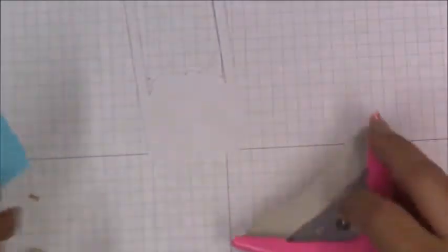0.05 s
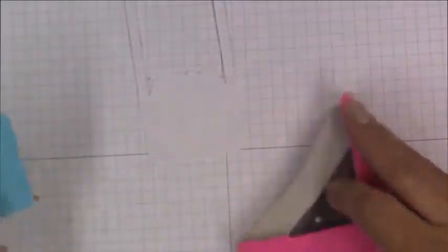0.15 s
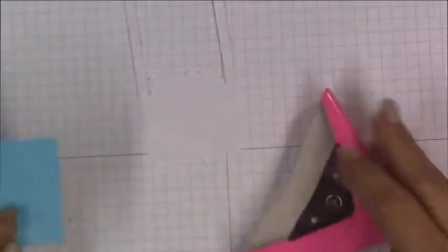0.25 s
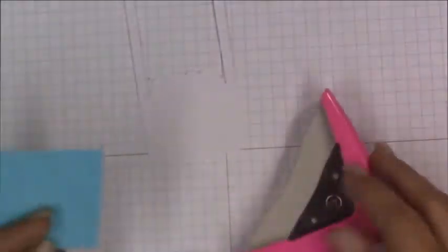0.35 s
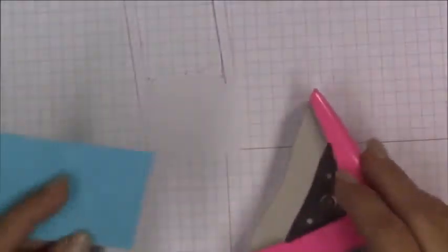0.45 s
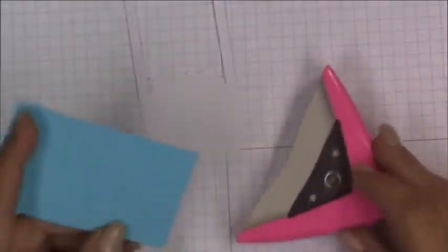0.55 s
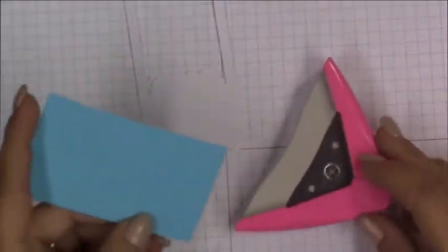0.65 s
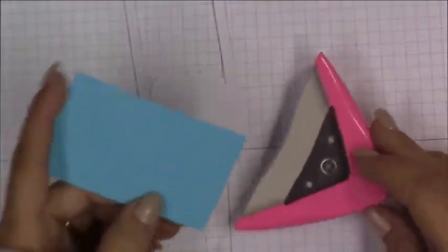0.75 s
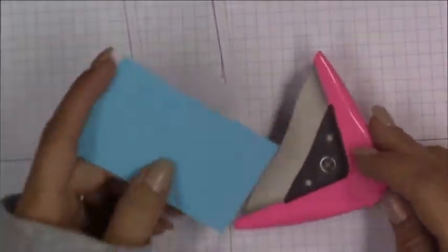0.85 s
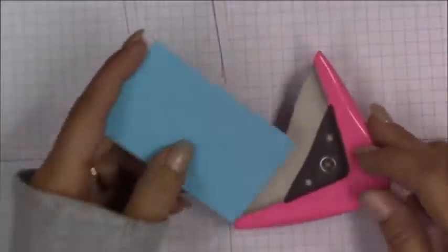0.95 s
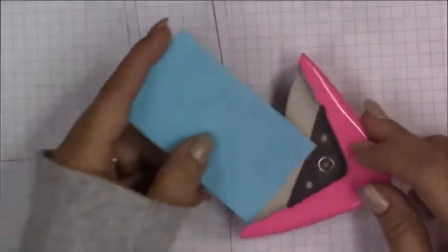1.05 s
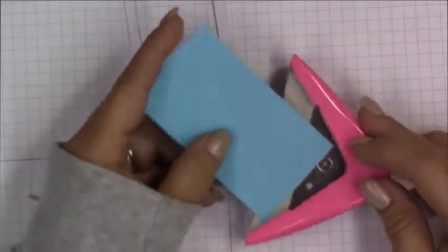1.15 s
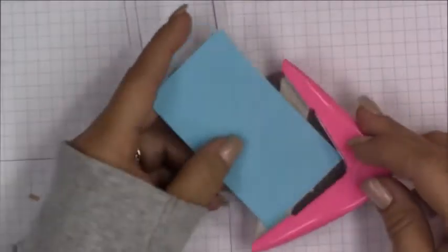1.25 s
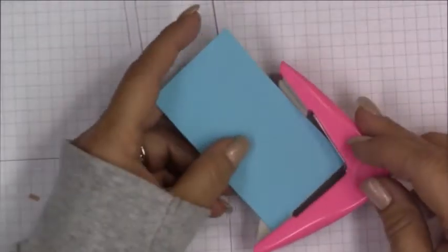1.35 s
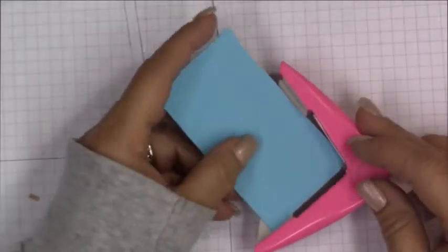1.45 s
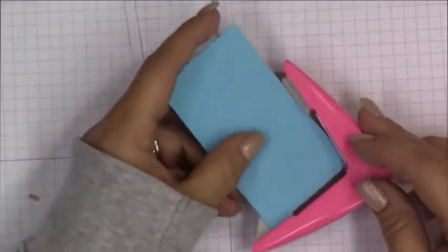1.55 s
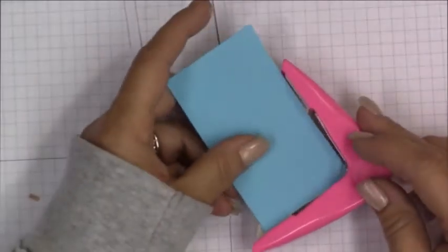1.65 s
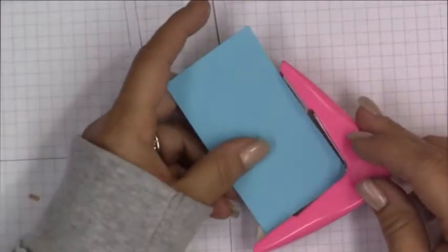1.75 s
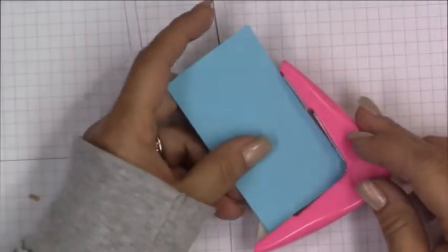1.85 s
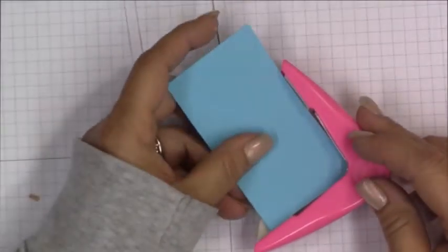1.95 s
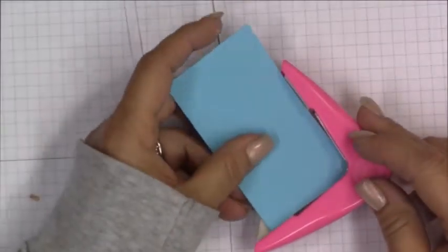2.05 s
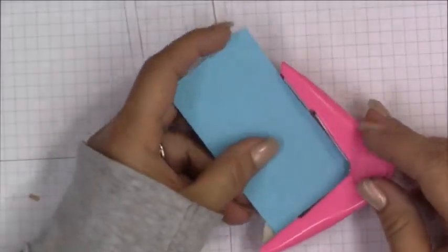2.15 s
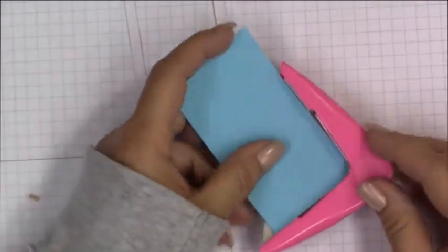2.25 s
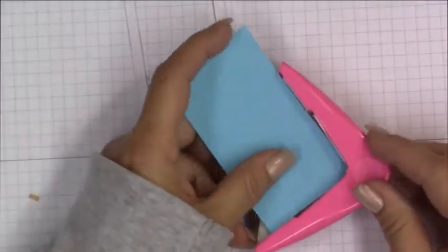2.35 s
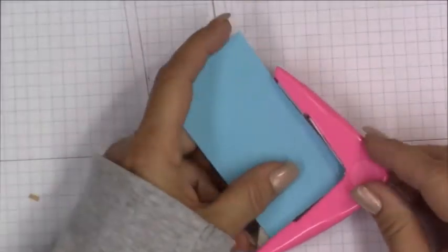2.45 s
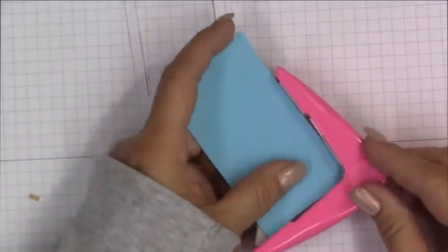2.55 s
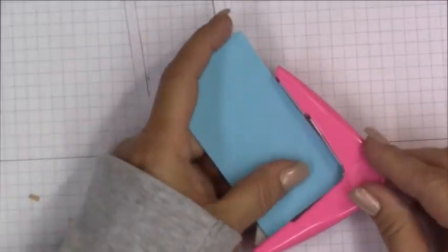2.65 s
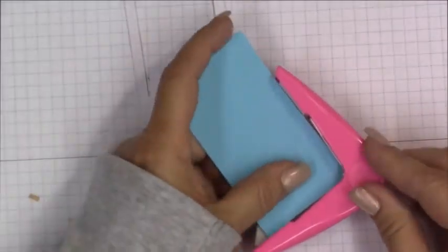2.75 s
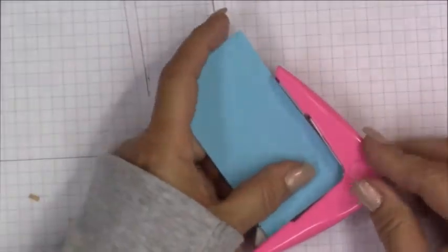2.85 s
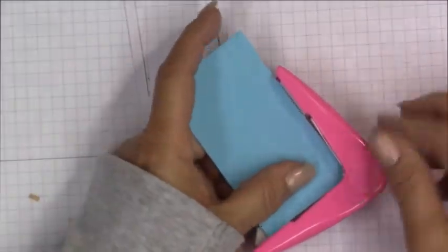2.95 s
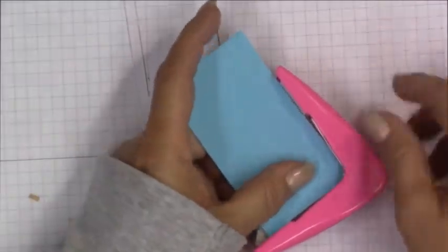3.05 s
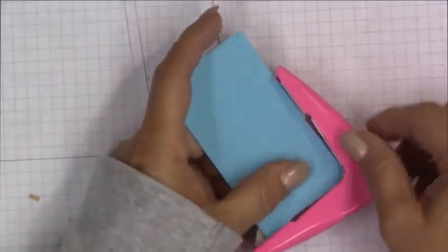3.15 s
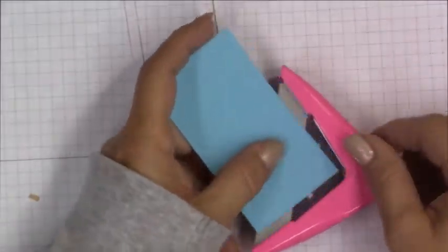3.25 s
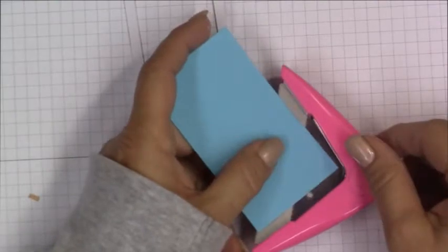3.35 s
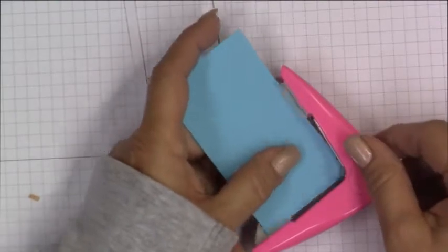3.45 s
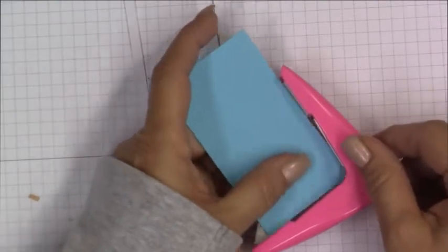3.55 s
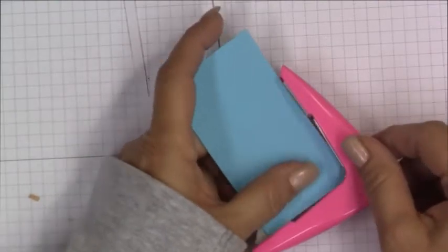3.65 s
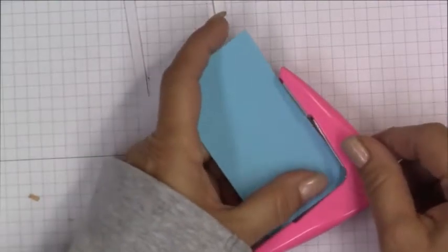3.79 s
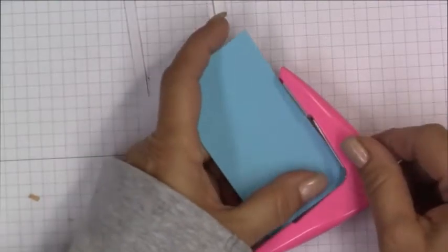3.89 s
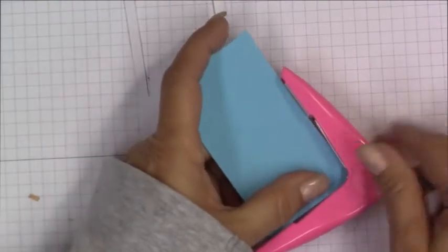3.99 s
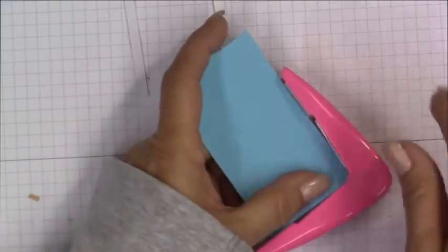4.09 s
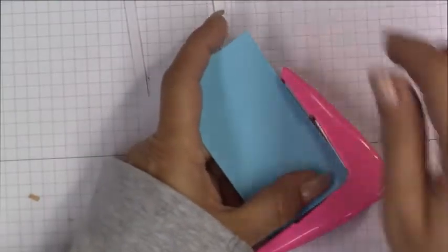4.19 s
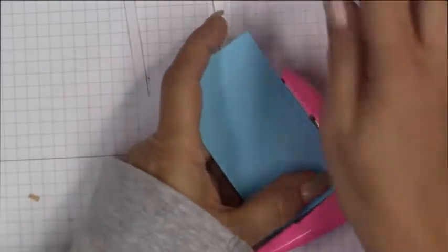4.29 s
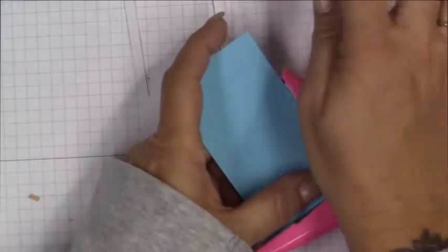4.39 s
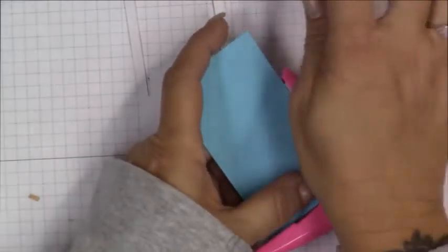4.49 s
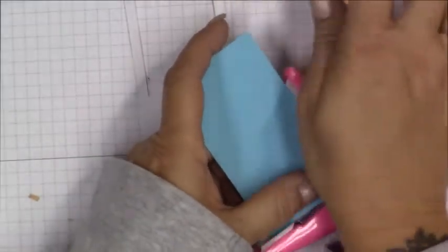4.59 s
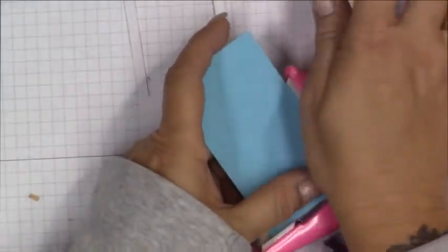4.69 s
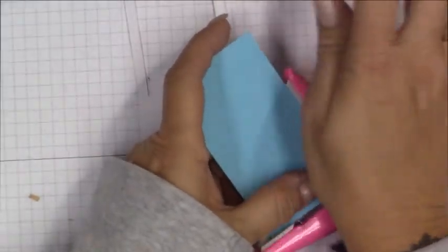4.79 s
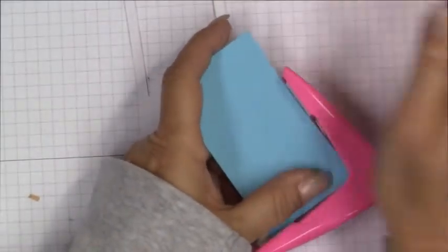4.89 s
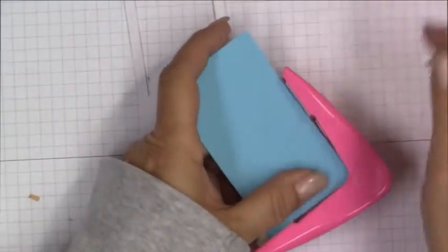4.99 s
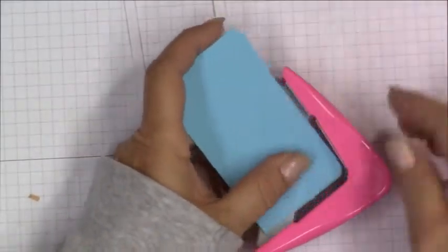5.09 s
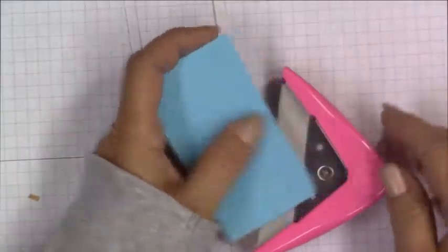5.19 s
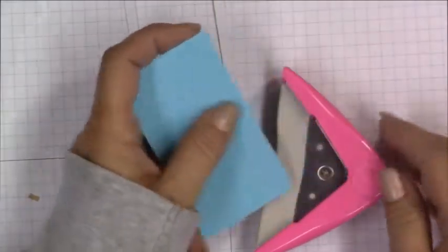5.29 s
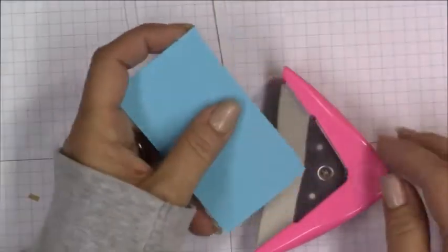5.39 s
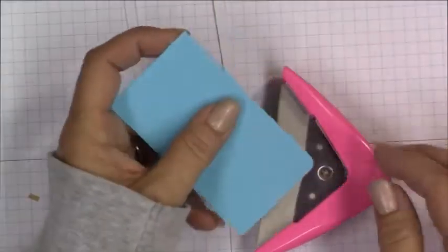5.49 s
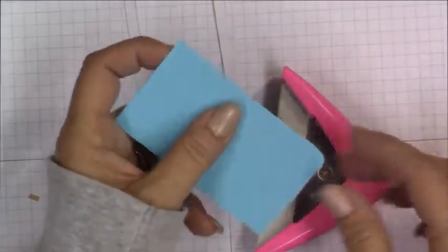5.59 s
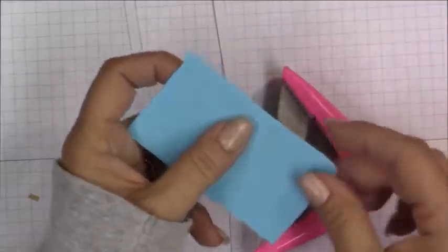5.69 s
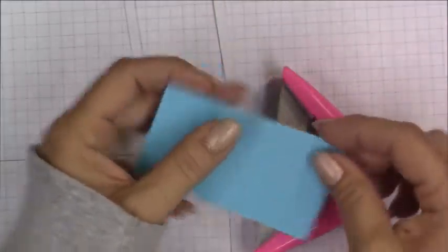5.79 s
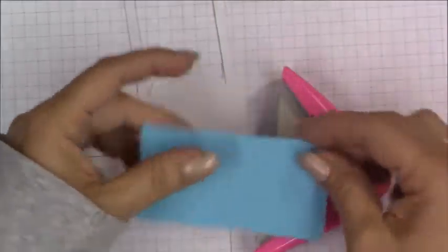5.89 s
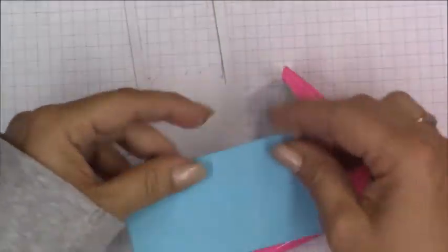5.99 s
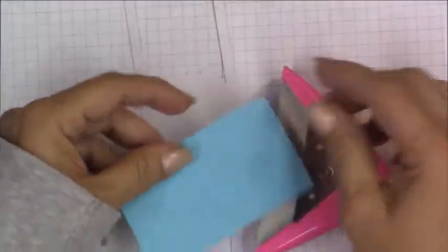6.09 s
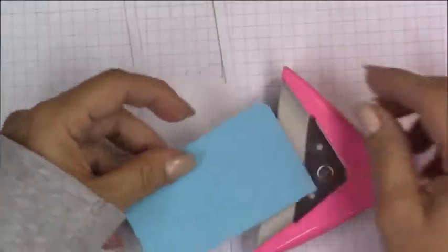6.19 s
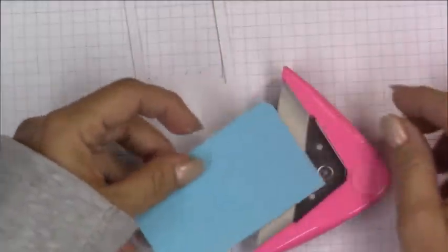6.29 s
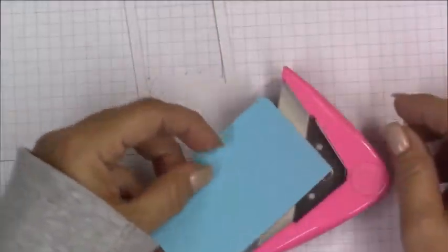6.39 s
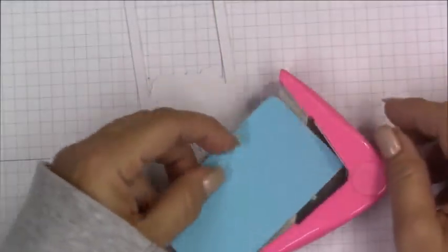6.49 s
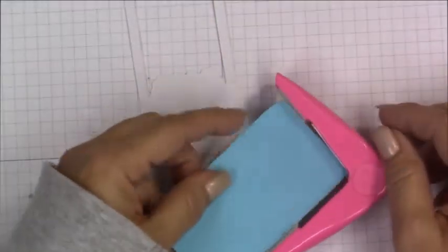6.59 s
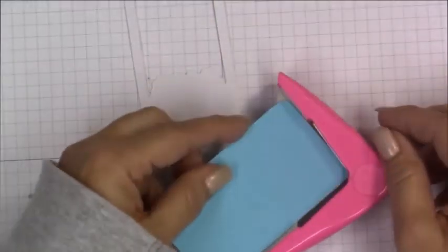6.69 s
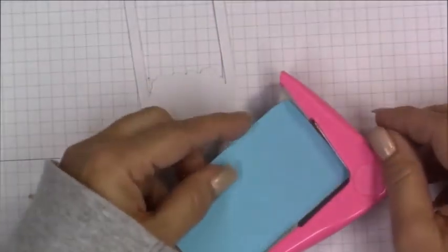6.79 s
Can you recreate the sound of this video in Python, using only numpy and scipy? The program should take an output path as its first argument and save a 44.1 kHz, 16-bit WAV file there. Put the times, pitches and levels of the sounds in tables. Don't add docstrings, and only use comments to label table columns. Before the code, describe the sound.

Soft card scraping and small ticks on a desk, then one loud, sharp plastic-and-steel punch clack, lighter spring clicks, and quiet paper brushing.

```python
import sys
import numpy as np
from scipy import signal
from scipy.fft import rfft, irfft, next_fast_len
from scipy.io import wavfile
from scipy.ndimage import uniform_filter1d

SR = 44100
rng = np.random.default_rng(int(sys.argv[2]) if len(sys.argv) > 2 else 0)


def ratio_of_db(decibels):
    return 10 ** (np.asarray(decibels, float) / 20)


def dump(signal):
    limited = np.clip(np.atleast_2d(signal).T, -1, 1)
    pcm = np.round(limited * 32767).astype(np.int16)
    wavfile.write(sys.argv[1], SR, pcm)


N = 301465


def decay(t, t60):
    return np.exp(-np.log(1000) * t / t60)


def band(x, hz, width):
    b, a = signal.iirpeak(hz, hz / width, fs=SR)
    return signal.lfilter(b, a, x)


def between(x, low_hz, high_hz):
    return signal.sosfilt(signal.butter(3, [low_hz, high_hz], "band", fs=SR, output="sos"), x)


def shape(x, table):
    hz, db = np.transpose(table)
    size = next_fast_len(N)
    f = np.maximum(np.arange(size // 2 + 1) * SR / size, 1)
    gain = ratio_of_db(np.interp(np.log(f), np.log(hz), db))
    return irfft(rfft(x, size) * gain, size)[:N]


def unit(x):
    return x / np.sqrt(np.mean(x ** 2))


def add(out, s, x, peak_db):
    i = int(s * SR)
    x = x[:N - i]
    out[i:i + len(x)] += x * ratio_of_db(peak_db) / np.abs(x).max()


def curve(s, level):
    return np.interp(np.arange(N) / SR, s, level)


def walk(rate):
    hold = int(SR / rate)
    steps = np.repeat(rng.standard_normal(N // hold + 1), hold)
    return unit(uniform_filter1d(steps, hold)[:N])


# f/Hz, level per Hz/dB
ROOM_TONE = [(20, -32), (40, -23.5), (80, -7.5), (150, -5), (250, -4.5), (400, -2.5), (800, -13),
             (1600, -10.5), (3200, -18.5), (9700, -25.5), (13700, -33.5), (16000, -38)]
# f/Hz, side minus mid/dB
ROOM_TONE_WIDTH = [(60, -4.5), (110, -12), (200, -5), (380, -7), (700, -1), (1290, -6.5), (2380, -5),
                   (4400, -6.5), (8120, -12.5), (15000, -27.5)]
# f/Hz, level/dB
MAINS_HUM = [(119.5, -68)]


def air():
    mid = shape(rng.standard_normal(N), ROOM_TONE)
    side = shape(rng.standard_normal(N), ROOM_TONE)
    tone_db = -60.5
    gain = ratio_of_db(tone_db + 0.65 * walk(2.5)) / np.std(mid)
    t = np.arange(N) / SR
    hum = np.zeros(N)
    for hz, db in MAINS_HUM:
        level = np.sqrt(2) * ratio_of_db(db + 0.8 * walk(5.3))
        hum += level * np.sin(2 * np.pi * hz * t + 0.4 * walk(5.0))
    return gain * mid + hum, gain * shape(side, ROOM_TONE_WIDTH)


# f/Hz, level/dB, t60/s, side minus mid/dB
ECHOES = [(150, -19.5, 0.43, -21), (400, -25.5, 0.15, -16.5), (900, -15.5, 0.27, -21.5),
          (2680, -19, 0.19, -20.5), (4600, -25, .16, -10), (6000, -20, 0.24, -7.5), (11000, -22, 0.11, -30)]


def room(dry, gap_ms=5.2):
    t = np.arange(16384) / SR
    tail = np.zeros((2, len(t)))
    for hz, db, t60, side_db in ECHOES:
        level = ratio_of_db([[db], [db + side_db]])
        tail += level * decay(t, t60) * band(rng.standard_normal((2, len(t))), hz, 0.9 * hz)
    tail *= np.clip(t * 1000 / gap_ms - 1, 0, 1) * ratio_of_db(-18.5)
    return signal.fftconvolve(dry[None], tail, axes=1)[:, :N]


def rustle(hz=11500, level_db=-72, end_s=0.37):
    fade = curve([end_s - 0.04, end_s], [1, 0])
    return unit(band(rng.standard_normal(N), hz, 500)) * fade * ratio_of_db(level_db)


# middle t/s, length/s, pressure level/dB, brightness/dB
CARD_IN = [(.05, .3, -65, -16), (0.224, 0.13, -56.5, -7), (.51, .09, -60.5, 5), (.575, 0.17, -56.5, 5.5),
           (.635, .07, -59, 3), (0.726, 0.08, -61, -7), (0.875, 0.059, -54.5, -1), (0.915, .3, -68, 4),
           (1.038, 0.19, -61, -2), (1.162, 0.17, -61, -7), (1.485, 0.48, -68.5, -14),
           (1.722, 0.065, -57.5, -9), (1.814, 0.086, -63.5, -19), (2.27, .08, -63, -18),
           (2.34, 0.18, -59, -6), (2.46, 0.13, -62.5, -9), (2.596, 0.17, -66, -9.5),
           (2.155, 0.11, -67, -14), (2.915, 0.092, -68, -8), (3.044, 0.066, -63.5, -11),
           (3.283, 0.15, -62.5, -2), (3.528, 0.086, -58, -10.5), (3.64, 0.094, -64, -5),
           (3.756, 0.052, -63.5, -3), (3.804, 0.072, -60, -18), (4.018, 0.033, -64.5, -3),
           (4.101, 0.15, -60, -9)]
# middle t/s, length/s, pressure level/dB, brightness/dB
CARD_OUT = [
    (5.295, 0.3, -64, -3),
    (5.488, 0.13, -67.5, -5.5),
    (5.666, 0.08, -66, -1),
    (5.806, 0.064, -58.5, -13),
    (5.918, 0.25, -62, 2),
    (6.11, .07, -65, 0),
    (6.393, 0.12, -66.5, 4.5),
    (6.599, 0.18, -70, -4),
    (6.803, .06, -71, -9),
]


def strokes(share, db, rest_db):
    middle, length, press_db, bright_db = np.transpose(CARD_IN + CARD_OUT)[:, :, None]
    t = np.arange(0, N / SR, 1 / 500)
    swell = np.cos(np.pi * np.clip((t - middle) / length, -0.5, 0.5)).clip(0) ** 1.3
    power = (swell * ratio_of_db(press_db + share * bright_db + db)) ** 2
    return curve(t, np.sqrt(power.sum(0) + ratio_of_db(rest_db) ** 2))


# share of brightness, level/dB
BAND_LEAN = [(-0.36, -10), (-0.55, -5), (0.17, -1.5), (0.5, -3.5)]
# from f/Hz, to f/Hz
SCRAPE_BANDS = [(1100, 2700), (2600, 6100), (6500, 12800)]
# f/Hz, width/Hz, level/dB
CARD_MODES = [(1450, 170, 3), (2203, 200, 2), (2740, 200, -2.5), (3500, 290, 4.5), (4500, 300, -1),
              (5500, 260, 0.5), (6950, 480, 2), (9090, 500, 4.5), (10470, 390, 0.5)]


def slide(grain_db=4.2, flicker_db=3.0):
    resting_db = (-69.5, -75, -78, -88)
    hands, *levels = [strokes(share, db, rest) for (share, db), rest in zip(BAND_LEAN, resting_db)]
    murmur = unit(between(rng.standard_normal(N), 170, 920))
    out = murmur * hands * ratio_of_db(1.5 * walk(16.0))
    for (low_hz, high_hz), level in zip(SCRAPE_BANDS, levels):
        grains = ratio_of_db(grain_db * np.minimum(rng.exponential(size=N), 6))
        fibres = rng.standard_normal(N) * grains
        scrape = 1.8 * fibres
        for hz, width, db in CARD_MODES:
            if 0.8 * low_hz < hz < 1.2 * high_hz:
                scrape = scrape + ratio_of_db(db) * band(1.8 * fibres, hz, width)
        out += unit(between(scrape, low_hz, high_hz)) * level * ratio_of_db(flicker_db * walk(45.0))
    return out * curve([4.45, 4.48, 5.15, 5.21], [1, 0, 0, 1])


# t/s, peak level/dB, f/Hz, treble/dB
SOFT_TICKS = [(0.0737, -43, 1240, -14), (0.2028, -45, 3570, -19), (0.208, -44, 5200, -19),
              (0.213, -46, 2300, -15), (0.4845, -41, 6700, -30), (0.2337, -37, 2950, -22),
              (0.2594, -47, 3230, -5), (0.3318, -47.5, 3200, -7), (0.6327, -42, 2730, -11),
              (0.8706, -41, 1390, -16), (0.8725, -41, 2170, -12), (0.8673, -45, 3890, -16),
              (0.873, -43, 3900, -15), (0.8765, -42, 3800, -6), (0.8828, -43.5, 1400, -12),
              (0.706, -48, 2640, -13), (1.052, -45.5, 1450, -14), (0.637, -42.5, 3500, -9),
              (2.733, -48, 1800, -27), (2.908, -48, 4000, -20), (2.97, -50, 1800, -17),
              (1.115, -49, 1450, -25), (1.144, -42, 2380, -17), (1.4143, -48, 1660, -7),
              (1.699, -49, 1780, -16), (1.7125, -35.5, 1880, -11.5), (1.7382, -41.5, 1510, -25),
              (1.7945, -43.5, 4000, -26), (1.8085, -50, 1330, -21), (2.256, -45, 2480, -25),
              (2.435, -34.5, 2470, -32), (3.5115, -46.5, 1530, -11), (3.8094, -46, 1850, -33),
              (3.852, -47.5, 1390, -27), (4.04, -47.5, 1320, -18), (4.1496, -46.5, 2650, -22),
              (4.9407, -45, 3320, -26), (5.6528, -49.5, 1394, -8), (5.7917, -47, 1290, -24),
              (5.869, -48, 2890, -8), (6.1155, -48, 2070, -5.5), (6.5622, -49, 1527, -10),
              (5.907, -46, 2295, -12)]
# t/s, peak level/dB, f/Hz, treble/dB
SHARP_TICKS = [
    (0.1119, -32.5, 4500, -6),
    (0.434, -51, 3640, -9),
    (0.4843, -38.5, 3910, -13),
    (0.5453, -36.5, 3800, -19),
    (1.925, -42.5, 3960, -15),
    (2.4357, -32.5, 4450, -36),
    (6.6475, -41.5, 3700, -26),
    (1.66, -52, 3500, -21),
    (1.995, -56, 3500, -14),
    (6.035, -56, 3500, -5),
]


def ticks():
    out, t_ms = np.zeros(N), np.arange(2048) * 1000 / SR
    for table, rise_ms in [(SOFT_TICKS, 1.5), (SHARP_TICKS, 0.2)]:
        force = np.exp(-t_ms / 2.4) * np.minimum(t_ms / rise_ms, 1)
        for s, peak_db, hz, treble_db in table:
            paper, edge = rng.standard_normal((2, 2048)) * force
            paper = band(band(paper, hz, 0.23 * hz), hz, 2.1 * hz)
            edge = band(band(edge, 7400, 4600), 7600, 6500)
            add(out, s, paper, peak_db - 0.5)
            add(out, s, edge, peak_db + treble_db + 7)
    return out


# t/s, peak level/dB, f/Hz, swell/ms, t60/s
DESK_BOOM = [(4.638, -38, 88, 9, 0.23), (4.636, -27.5, 190, 6, .13), (4.636, -18, 685, 3, 0.075),
             (4.6365, -20.5, 1066, 2.3, .1), (4.638, -21, 808, 2.4, 0.11), (4.642, -22, 405, 19, 0.085),
             (4.69, -37, 420, 12, .1), (4.662, -22, 734, 6, 0.1), (4.664, -21.5, 1000, 5, 0.07),
             (4.682, -29, 1050, 8, .1), (4.668, -27, 335, 12, 0.068), (4.91, -33, 410, 12, .07),
             (4.922, -33.5, 410, 14, .04), (4.76, -63, 55, 90, .5)]
# t/s, peak level/dB, f/Hz, swell/ms
DESK_BUMPS = [(0.109, -33, 311, 3.3), (0.12, -41, 380, 10), (0.122, -40, 225, 9), (0.132, -39, 400, 11),
              (0.135, -43, 260, 10), (0.16, -45, 200, 12), (0.19, -48, 300, 6), (0.285, -50, 330, 8),
              (0.3, -51, 190, 6), (0.315, -53, 200, 6), (0.025, -52, 1220, 8), (0.055, -51, 1230, 12),
              (0.07, -52, 1210, 12), (0.232, -36, 320, 4.3), (0.256, -39, 362, 7.5),
              (0.272, -43.5, 201, 7.3), (2.774, -41.5, 345, 3), (2.775, -39, 940, 0.98),
              (2.871, -49, 237, 4.6), (4.576, -39, 667, 1.5), (4.595, -39, 697, 3), (4.611, -40.5, 400, 12),
              (4.879, -47, 199, 10.5), (4.901, -36, 520, 7), (4.925, -41, 900, 12), (4.91, -39, 1110, 5.5),
              (5.146, -42, 620, 2.4), (5.147, -47, 950, 2), (5.155, -50, 300, 6), (5.165, -54, 600, 4),
              (5.11, -41, 750, 3), (5.114, -47, 800, 3), (0.01, -56, 777, 30), (0.235, -50, 950, 8),
              (0.255, -50, 1000, 10), (0.255, -50, 1600, 5), (4.576, -41, 370, 3), (5.108, -44, 420, 2.3),
              (4.905, -37, 743, 6.8)]


def desk(bump_t60=0.04, wander_depth=1.3):
    out, t = np.zeros(N), np.arange(8192) / SR
    for s, peak_db, hz, swell_ms, t60 in DESK_BOOM + [bump + (bump_t60,) for bump in DESK_BUMPS]:
        swell = np.sin(np.pi / 2 * np.minimum(t * 1000 / swell_ms, 1)) ** 2
        after = np.maximum(t - swell_ms / 1000, 0)
        drift = np.cumsum(uniform_filter1d(rng.standard_normal(len(t)), size=256))
        wander = drift * wander_depth * hz / SR * np.minimum(t / 0.03, 1)
        ring = np.sin(2 * np.pi * hz * t + wander) * decay(after, 4 * t60)
        blur = unit(band(band(rng.standard_normal(len(t)), hz, 0.3 * hz), hz, 0.61 * hz))
        add(out, s, (ring + 0.3 * blur) * swell * decay(after, t60), peak_db)
    return out


# f/Hz, level/dB, t60/s
PUNCH_MODES = [(710, -22, 0.97), (1022, -20.5, 0.35), (1230, -30.5, 0.35), (2054, -19, 0.21),
               (2183, -2.5, 0.018), (2430, -13, 0.11), (2410, -4.5, 0.12), (2440, -21, 0.33),
               (2650, -8.5, 0.11), (3000, -23, 0.29), (3140, -13.5, 0.091), (3490, -21, 0.53),
               (3600, -25, 0.31),
               (4540, -34.5, 0.19), (4802, -39.5, 0.55), (4850, -22, 0.14), (5380, -30, 0.33),
               (5400, -19.5, 0.094), (6160, -23.5, 0.13), (7000, -34, 0.65), (6400, -25, 0.15),
               (8430, -25.5, 0.14), (7510, -22.5, 0.3), (8300, -23.5, 0.092), (8750, -32.5, 0.18),
               (8770, -20.5, 0.096)]
# t/s, peak level/dB, struck part f/Hz, treble/dB, chatter/ms
BLADE_CLACK = [(4.6367, -2, 2310, -16, 0.7), (4.637, 0, 3136, -15, 0.8), (4.6394, -7, 2900, -10.5, .8),
               (4.6405, -12, 6500, 1.5, 1.2), (4.6442, -10, 2900, -16, 2.5), (4.649, -13, 2750, -9, 2),
               (4.655, -14.5, 3100, -8.5, 3.4), (4.663, -17, 2687, -10, 4), (4.6402, -19.5, 5500, -8, 2),
               (4.64, -13, 3800, -20.5, 2), (4.6372, -16, 1440, -25, 1.5), (4.639, -19, 1660, -25, 1.5),
               (4.6455, -10, 2000, -20, 2), (4.667, -24, 3100, -12, 3), (4.695, -26, 2750, -15, 5)]
# t/s, peak level/dB, struck part f/Hz, treble/dB, chatter/ms
CARD_NUDGES = [
    (2.774, -28, 2300, -13, 0.72),
    (2.7745, -30, 1470, -30, 1.2),
    (2.8367, -28, 2200, -10, .8),
    (2.837, -31, 4000, -7, .8),
    (2.842, -42, 2200, -20, 2),
    (2.844, -46, 4900, -15, 3),
    (2.784, -42, 2600, -30, 1.5),
    (2.782, -39, 1470, -30, 1.5),
]
# t/s, peak
# level/dB, struck part f/Hz, treble/dB, chatter/ms
LEVER_CLICKS = [(2.8375, -33, 4940, -8, 1.6), (4.4815, -43, 2260, -3, 1.6), (4.4951, -29, 2300, -20, 0.95),
                (4.495, -29, 3640, -7, 1), (4.495, -31, 4950, -12, 1.5), (4.4957, -34, 6800, -10, 1.6),
                (4.506, -45, 2300, -14, 1.8), (4.5745, -21, 8900, -20, 1.2), (4.577, -25.5, 3300, -10, 1.6),
                (4.891, -34, 7760, -20, 1.1), (4.915, -31, 2700, -9, 4), (5.109, -29, 5450, -14, 3),
                (4.5742, -20, 2600, -8, 1.1), (4.576, -25, 1410, -6, 2.1), (4.5935, -22.5, 4870, -14, 0.94),
                (4.594, -33, 6700, -14.5, 2.6), (4.878, -37, 900, -18, 5.7), (4.891, -23.5, 2500, -8, 1.5),
                (4.89, -27, 1100, -11, 1.3), (4.891, -25, 5360, -18, 2.6), (4.899, -23, 900, -11.5, 3),
                (4.9053, -18, 3430, -6, 1.16), (4.905, -28, 2500, -6, 4), (4.907, -20.5, 3700, -12, 2.7),
                (5.105, -26, 2610, -4.5, 2.3), (5.1073, -23, 3710, -13, 1.9),
                (5.1102, -21.5, 3160, -12, 1.5), (5.109, -31, 1500, -16, 3.7),
                (5.1098, -25, 2350, -16, 1.5), (4.905, -27, 6200, -14, 3), (4.909, -24, 3100, -10, 1.2)]


def punch(rise=0.7, rattle_db=-16, rattle_t60=0.066):
    out, t = np.zeros(N), np.arange(4096) / SR
    t_ms = t[:1024] * 1000
    hz, db, t60 = np.transpose(PUNCH_MODES)[:, :, None]
    touches = [(BLADE_CLACK, 0.15, 0.65, 1.4, 0.016),
               (CARD_NUDGES, 0.09, 0.17, 6.0, 0.018),
               (LEVER_CLICKS, 0.03, 0.5, 1.5, 0.009)]
    knocks = [knock + tuple(touch) for table, *touch in touches for knock in table]
    for s, peak_db, part_hz, treble_db, chatter_ms, ring, reach, clear, part_t60 in knocks:
        force = np.minimum(t_ms / (rise * chatter_ms), 1) ** 3 * np.exp(-t_ms / chatter_ms)
        contact = rng.standard_normal(1024) ** 3 * force
        snap = np.pad(rng.standard_normal(1024) * force, (0, 1024))

        phase, luck = rng.random((2, len(hz), 1))
        near = ratio_of_db(db + 6.4 * luck - 2.9 * (np.log2(hz / part_hz) / reach) ** 2)
        modes = near * np.sin(2 * np.pi * (hz * t + 0.26 * phase)) * decay(t, np.minimum(t60, 0.25) * ring)
        part = clear * near.max() * np.sin(2 * np.pi * part_hz * t) * decay(t, part_t60)
        body = signal.fftconvolve(contact, modes.sum(0) + part)
        body = band(body, part_hz, 2.5 * reach * part_hz)

        rattle = rng.standard_normal(len(t)) * decay(t, rattle_t60 * (1 + 3.7 * ring))
        rattle *= np.cos(np.pi / 2 * t / t[-1])
        rattle = band(band(rattle, 1.1 * part_hz, 1.1 * part_hz), part_hz, 3 * reach * part_hz)
        crack = band(band(snap, part_hz, 0.52 * reach * part_hz), part_hz, 1.4 * reach * part_hz)
        treble = band(band(snap, 8200, 5200), 7200, 6200)

        add(out, s, rattle, peak_db + rattle_db)
        add(out, s, body, peak_db - 3)
        add(out, s, crack, peak_db - 9)
        add(out, s, treble, peak_db + treble_db - 1.3)
    return between(out, 760, 15500)


def scene():
    dry = rustle() + slide() + ticks() + punch()
    boom = desk()
    wet_mid, wet_side = room(dry + 0.75 * boom)
    air_mid, air_side = air()
    mid = dry + boom + wet_mid + air_mid
    side = wet_side + air_side + 0.09 * band(dry, 6500, 4500)
    return np.array([mid + side, mid - side])


def low_pass(x):
    return signal.sosfilt(signal.butter(12, 16490, fs=SR, output="sos"), x)


def record(dry):
    heard = signal.sosfilt(signal.butter(2, 35, "high", fs=SR, output="sos"), dry)
    heard = np.clip(heard, -0.9, 0.9)
    heard = signal.sosfilt(signal.ellip(8, 0.2, 70, 15850, fs=SR, output="sos"), heard)
    return low_pass(heard)


dry = scene()
out = record(dry)
dump(out)
```